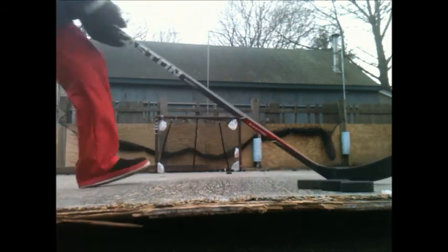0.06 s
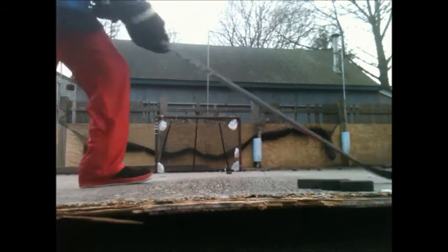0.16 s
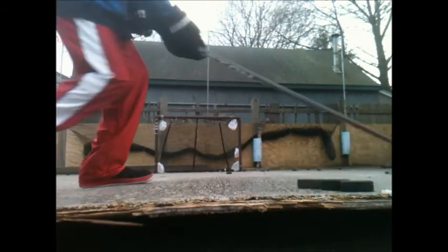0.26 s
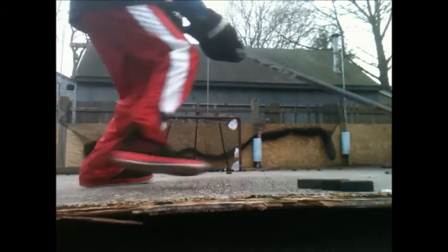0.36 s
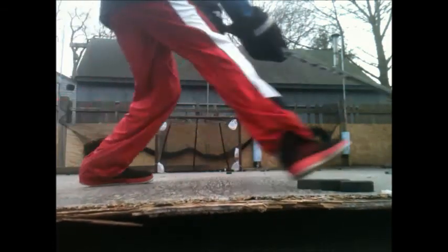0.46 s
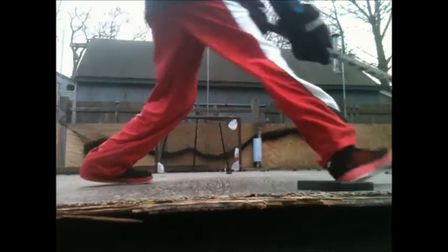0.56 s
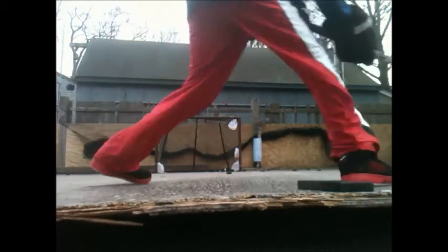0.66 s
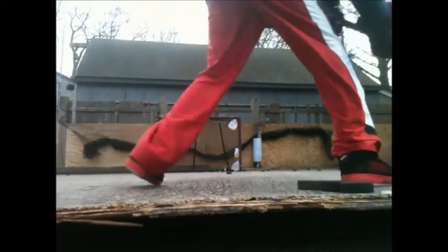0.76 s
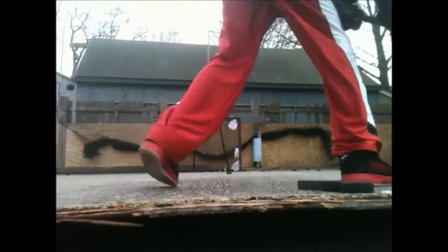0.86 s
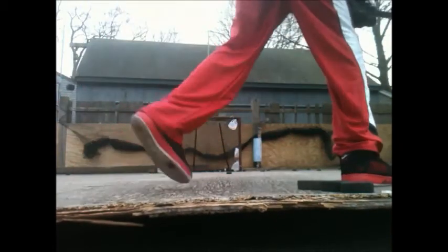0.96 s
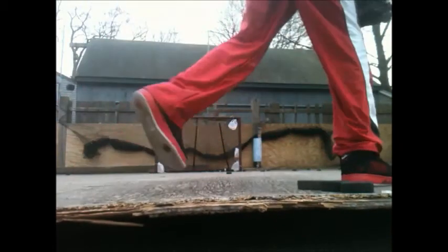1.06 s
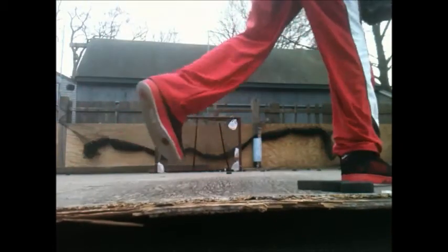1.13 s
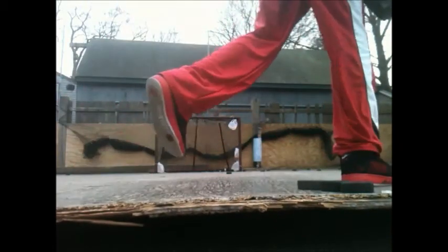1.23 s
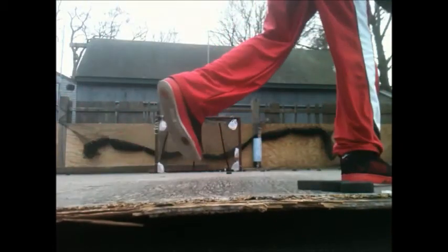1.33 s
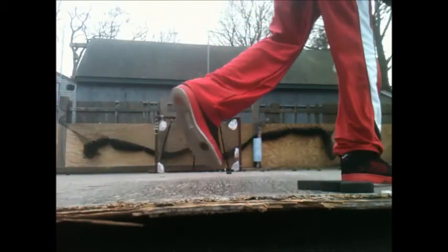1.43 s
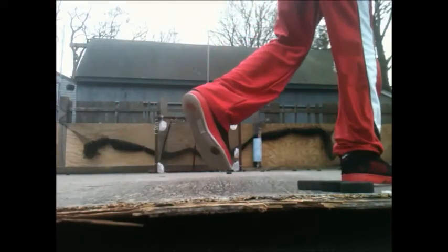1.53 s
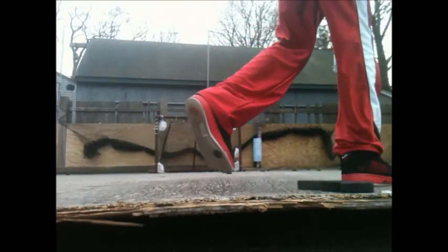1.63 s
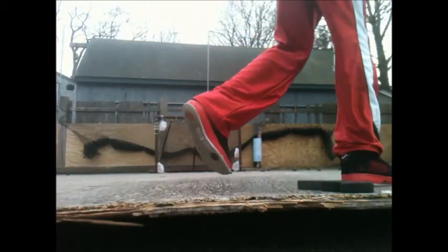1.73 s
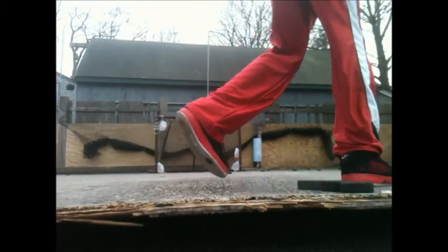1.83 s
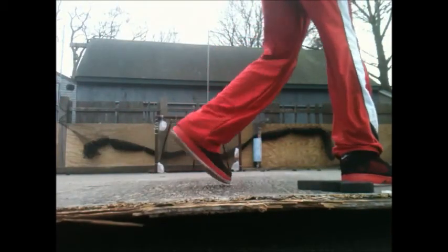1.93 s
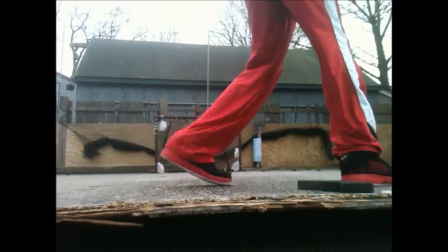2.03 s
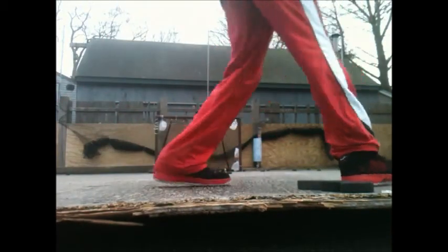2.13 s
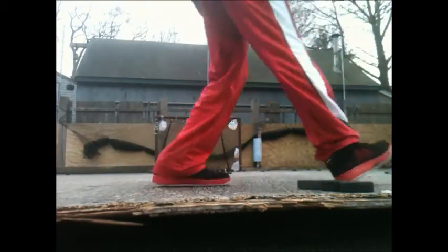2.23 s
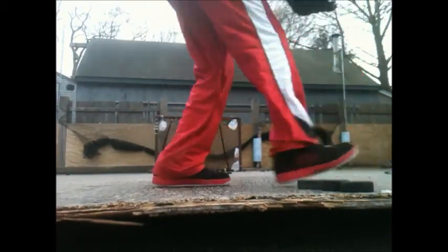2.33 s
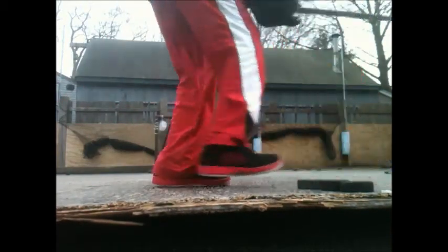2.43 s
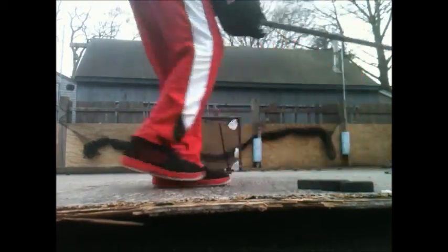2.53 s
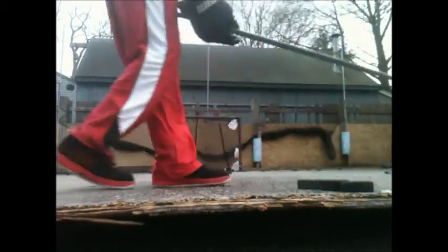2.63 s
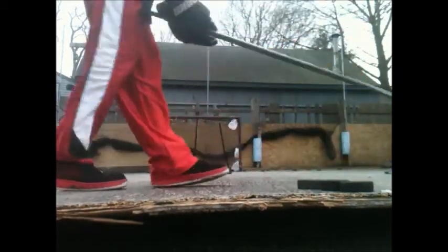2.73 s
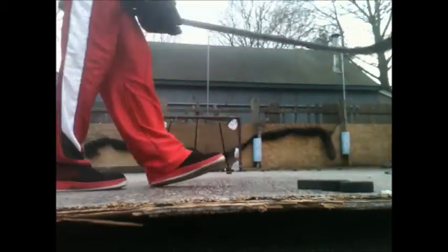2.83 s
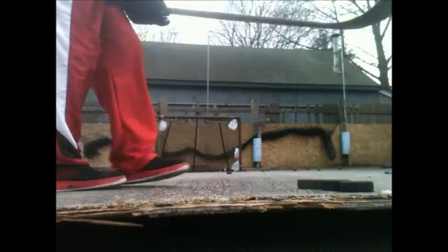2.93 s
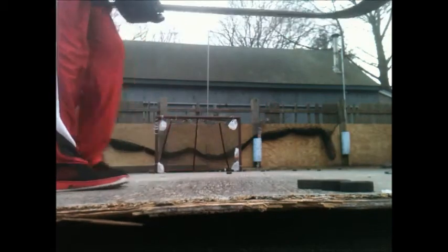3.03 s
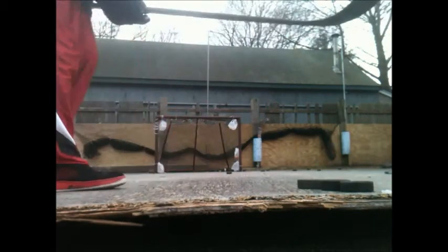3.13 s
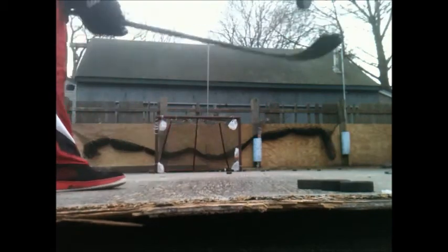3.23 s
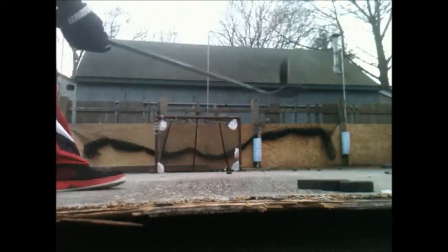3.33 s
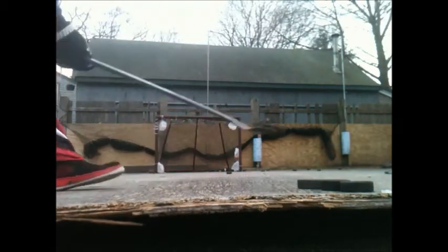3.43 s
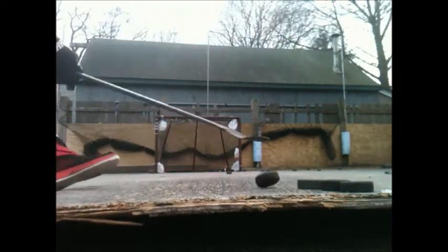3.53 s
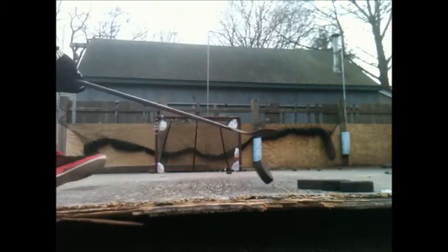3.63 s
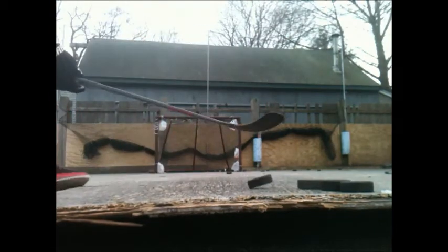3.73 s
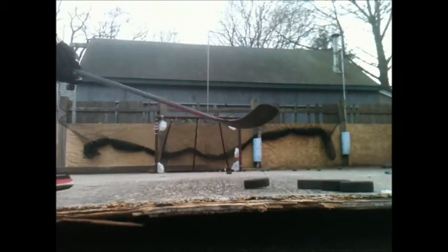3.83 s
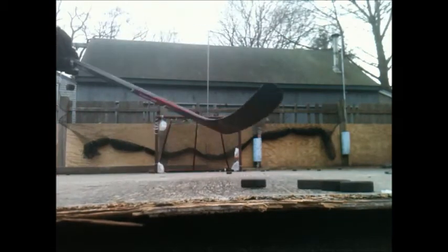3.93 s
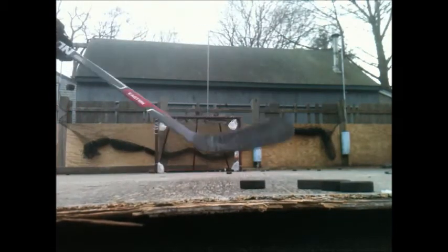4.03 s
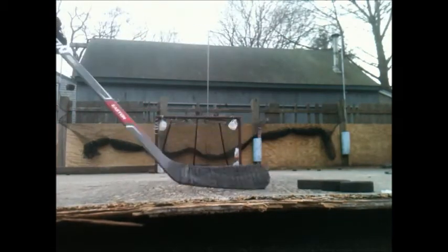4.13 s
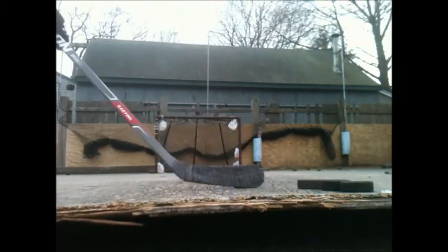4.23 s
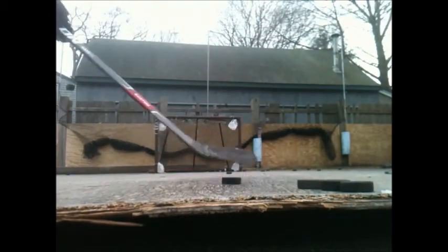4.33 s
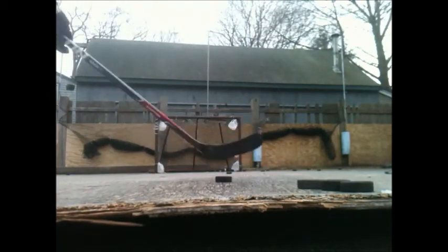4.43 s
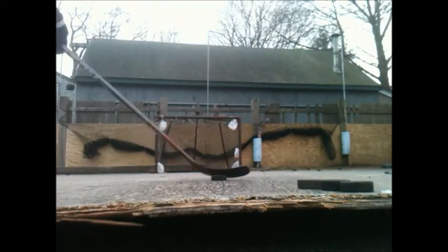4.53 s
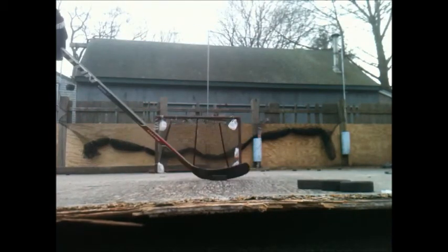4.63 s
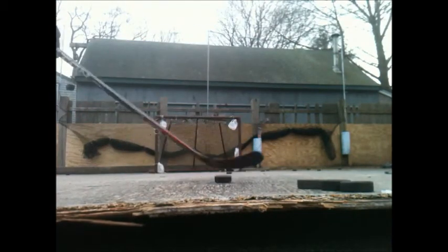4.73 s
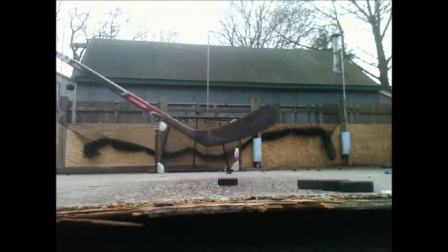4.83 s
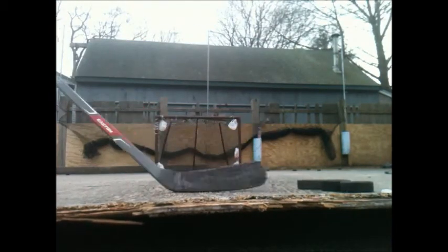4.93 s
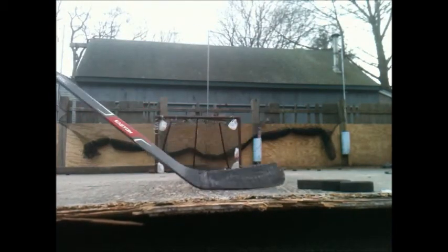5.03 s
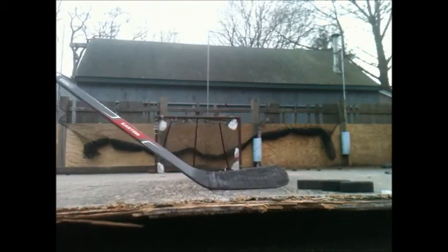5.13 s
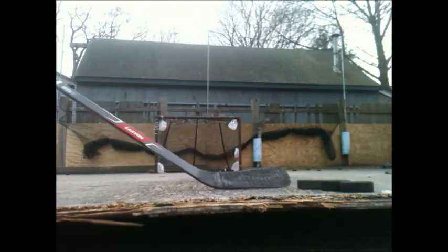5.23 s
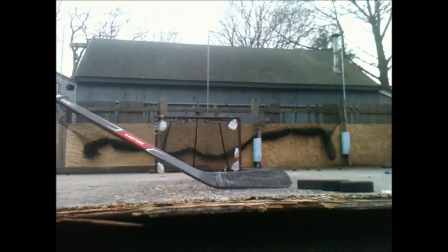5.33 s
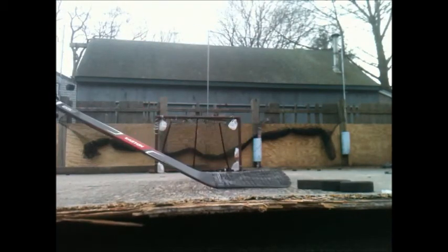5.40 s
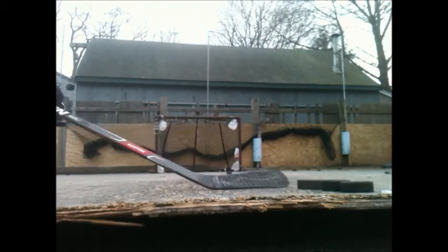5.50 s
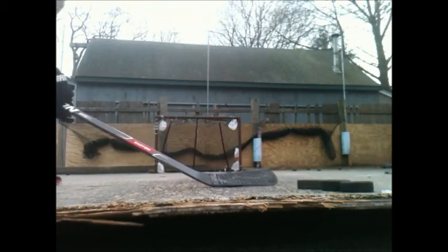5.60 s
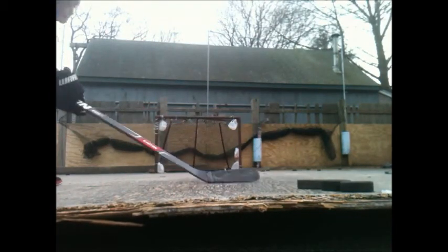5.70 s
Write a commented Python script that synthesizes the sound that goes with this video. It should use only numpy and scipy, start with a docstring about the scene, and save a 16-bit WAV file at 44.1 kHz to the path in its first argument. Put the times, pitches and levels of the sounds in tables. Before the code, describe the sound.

Heard up close in a backyard, a stick and puck clack and scrape on a gritty wooden board. A quick drag and cracking shot come first, followed by a dull, distant boom. After a lull of light shoe scuffs and rustling pants, a loud knock starts a busy run of bounces, taps and slides, peaking in a slap of the blade that overloads the microphone. A faint outdoor hum lies underneath.

```python
"""A hockey stick and puck knock on a wooden shooting board, heard from its edge in a backyard.
The stick drags and shoots a puck with a crack, and the far boards boom. The player steps over, knocks
a new puck off the pile, lets it bounce, taps it into place and slaps the blade down. Blows make the
wood ring, rubs crunch on its grit, and track pants swish over a faint outdoor hum.
The yard adds a thin echo, and the nearest blows overload the microphone."""
import sys
import numpy as np
from scipy import signal
from scipy.fft import rfft, irfft, next_fast_len
from scipy.io import wavfile
from scipy.ndimage import uniform_filter1d, map_coordinates

SR = 44100
rng = np.random.default_rng(int(sys.argv[2]) if len(sys.argv) > 2 else 0)


def dump_mix(stems):
    """Bounce the given channels to the path in sys.argv[1] as a 16-bit WAV at rate SR."""
    frames = np.atleast_2d(stems).T  # one column per channel
    limited = np.clip(frames, -1, 1)  # hard clip at full scale
    pcm = np.round(limited * 32767).astype(np.int16)
    wavfile.write(sys.argv[1], SR, pcm)


N = 254016
T = np.arange(SR // 3) / SR  # seconds within one blow

# The tone colours of the noises. Each row: frequency in Hz, relative level there in dB.
AIR_COLOUR = [(15, -62), (25, -41.5), (48, -23), (70, -11.5), (206, -2.5), (242, -7), (317, -7),
              (394, -13.5), (476, -11), (1190, -13.5), (2220, -31.5), (9570, -27.5), (14800, -34),
              (16000, -41)]  # distant outdoor hum
BOOM_COLOUR = [(50, -22), (110, -4.5), (170, 7), (330, -1.5), (520, 2), (750, -6), (1500, -10),
               (4000, -30.5)]  # the dull far boards
RUMBLE_COLOUR = [(30, -39.5), (100, -9), (180, 0), (300, 0.5), (550, 0), (1000, -6), (1600, -15),
                 (3000, -25.5), (8000, -51)]  # rubbed wood
HISS_COLOUR = [(500, -17), (1500, -4), (3500, -2), (5500, -5), (7500, -7), (10500, -12.5), (12500, -23.5),
               (15500, -16.5)]  # sliding and cloth
GRIT_COLOUR = [(500, -19), (1500, 2), (2500, -2.5), (3400, -1.5), (4400, -7), (5600, -1.5), (7500, -7.5),
               (10500, -15), (15500, -27.5)]  # crunching grit
CLACK_COLOUR = [(200, -16.5), (550, -1.5), (850, 4), (1100, -4), (1350, -2.5), (1800, -17.5), (2600, -24.5),
                (5000, -46), (16000, -70.5)]  # the woody middle of a blow
CRACK_COLOUR = [(500, -16.5), (1500, -4), (2400, -4.5), (3800, 1), (5500, -8.5), (7500, -12.5),
                (10000, -23.5), (15500, -28)]  # the bright top of a blow
# The yard's echo. Each row: frequency in Hz, seconds to fade by 60 dB.
ECHO_TIMES = [(150, 0.5), (500, 0.52), (1500, 0.56), (4000, 0.4), (12000, 0.27)]
# Swings of a leg. Each row: middle in seconds, half length in seconds, level in dB.
LEG_SWINGS = [(0.047, 0.22, -67), (0.622, 0.28, -64), (1.714, 0.12, -71.5), (2.19, 0.2, -67.5),
              (2.794, 0.21, -65.5), (3.436, 0.062, -59.5)]
# Chirps of the taped blade. Each row: middle in seconds, half length in seconds, pitch in Hz, level in dB.
BLADE_SQUEAKS = [(3.936, .035, 3370, -49), (4.539, 0.0079, 3460, -48)]
# Short scuffs of blade and shoes. Each row: start and length in seconds, rumble and crunch in dB.
SHORT_SCUFFS = [(0.035, 0.081, -50, -52), (0.141, 0.032, -34, -47), (0.179, 0.028, -28.5, -40.5),
                (0.588, 0.048, -22.5, -33), (0.649, 0.033, -32.5, -33.5), (2.123, 0.16, -62, -60),
                (2.289, 0.019, -37.5, -44.5), (2.536, 0.086, -45.5, -63), (2.673, 0.06, -42, -44.5),
                (2.907, 0.046, -46.5, -48.5), (3.141, 0.054, -52, -55), (3.34, 0.11, -50, -53),
                (4.247, 0.061, -40, -49), (5.66, 0.054, -31.5, -49.5)]
# Puck or blade pushed across the board. Each row: start and length in seconds, rumble and hiss in dB,
# seconds to reach full pressure.
LONG_GLIDES = [(3.615, 0.24, -46, -54.5, .02), (3.855, 0.14, -31, -43, 0.027),
               (4.19, .13, -37.5, -60, 0.014), (4.357, 0.25, -35, -55, 0.018),
               (4.625, 0.15, -35.5, -57, 0.012), (4.837, 0.37, -33.5, -48, .02),
               (5.005, 0.073, -18.5, -53, 0.016), (5.145, 0.048, -29, -34.5, .012),
               (5.243, 0.21, -50, -63.5, .02), (5.483, 0.31, -26.5, -46.5, 0.16)]
# The resonances of the stick's blade. Each row: pitch in Hz, width in Hz, level in dB.
BLADE_TONES = [(590, 160, 11), (1023, 150, 11), (1290, 250, 6), (1750, 470, 2.5), (2170, 480, -1),
               (2590, 530, -2), (3750, 410, -0.5), (4780, 870, -2), (5660, 1200, -2), (7400, 570, -2.5),
               (10200, 1300, -9.5)]
# Sharp clicks and snaps, alone or as the bright edge of a blow on the board.
# Each row: start in seconds, level in dB, centre in Hz, width as a multiple of the centre.
HARD_CLICKS = [(.1225, -30.5, 3470, 0.91), (0.3453, -41.5, 5430, 1.54), (.404, -45.5, 2515, 0.78),
               (0.593, -21, 4650, 0.94), (0.6481, -19, 1983, 0.81), (.664, -26.5, 4800, 0.56),
               (0.678, -23, 3730, 2.5), (0.7143, -14, 3700, 1.94), (0.7419, -25, 2730, 1.3),
               (0.9013, -38, 2500, .6), (1.011, -41.5, 2080, 0.85), (1.116, -32.5, 1560, 0.91),
               (2.048, -40.5, 3020, 1.14), (2.121, -39, 2780, 1.46), (2.309, -34.5, 4500, 1.6),
               (2.5814, -35, 2900, 2.3), (2.8506, -29, 3570, 1.1), (3.155, -40, 4750, 0.96),
               (3.404, -31, 3462, 3.9), (3.642, -34.5, 3700, 1.37), (4.2985, -38, 3953, 0.59),
               (4.7512, -40, 4694, 1.974), (4.779, -42.5, 4940, 2), (4.844, -33, 1924, 0.96),
               (4.982, -7.5, 1900, 0.38)]
# The tones of the wooden board. Each row: pitch in Hz, level in dB, base seconds to fade by 60 dB.
BOARD_TONES = [(184, -23, 0.22), (231, -27.5, 0.11), (290.2, -5.5, 0.21), (310.7, -8, 0.25),
               (352.5, -4, 0.093), (403, 3, 0.063), (463.4, -1, 0.065), (528.6, 0, 0.089), (570, -7, 0.069),
               (720, -12.5, 0.14), (815, -14.5, 0.1), (1324, -28, 0.088)]
# Stick, puck and feet hitting the board. Each row: start in seconds, thud level in dB, clack and crack
# in dB relative to the thud, favoured pitch in Hz, ring length factor, rebound gap in seconds.
BOARD_BLOWS = [(0.124, -29, -3.5, -6, 350, 1.35, 0), (.187, -25.5, 0, -21.5, 549, 1.13, 0.0015),
               (0.592, -13.5, -3, -22, 354, 0.32, 0.0024), (0.616, -12.5, -10.5, -10, 450, 0.28, 0),
               (0.6479, -18.5, -2.5, -14, 590, 0.42, 0), (2.013, -30, -2.5, -23, 372, 0.92, 0.0067),
               (2.671, -19, -8.5, -22.5, 480, 0.75, 0.0011), (3.405, -29.5, 7.5, -8, 690, 1.35, 0),
               (3.5781, 3, -4.5, -11, 424, .9, .011), (3.7536, -3, -4, -11.5, 451.3, 0.91, .015),
               (3.886, -17.5, -33, -41, 410, 1.4, 0), (3.896, -13, -12, -20.5, 417, 0.64, 0),
               (3.984, -15.5, -16.5, -27, 346.4, 0.33, 0.00011), (4.022, -11, -10, -23, 406.6, 0.76, 0.021),
               (4.168, -2.5, -6.5, -16.5, 388, 0.77, 0.0059), (4.224, -20.5, -3, -20, 351, 0.64, 0.00055),
               (4.257, -23.5, -19, -12.5, 365.5, 1.06, 0), (4.339, -36.5, 4.5, -6.5, 360, 0.58, 0.00038),
               (4.366, -22, 1, -21, 591, 1.3, 0), (4.424, -19.5, -2, -19, 530, 1.35, 0.00085),
               (4.514, -30, -14, -18, 340, 0.75, 0), (4.614, -8, -1, -28.5, 523, 0.62, .013),
               (4.658, -18.5, -7, -30.5, 484, 0.41, 0), (4.816, -17, 1, -23.5, 493, 0.94, 0.0051),
               (4.981, 3, -6, -7.5, 444, 0.75, 0.011), (5.0669, -8, -4.5, -15.5, 399.3, 1.12, 0),
               (5.106, -10.5, -8, -29.5, 303, 0.54, 0), (5.479, -9.5, -7, -29.5, 380, 0.67, 0),
               (5.604, -12, -10, -27, 535, 0.79, 0), (5.611, -11.5, 4, -19.5, 517, 0.61, 0.019)]


def amp(db):
    """Turn decibels into a gain."""
    return 10 ** (np.asarray(db) / 20)


def unit(x):
    """Scale a sound to an average (rms) level of 1."""
    return x / np.sqrt(np.mean(x ** 2) + 1e-20)


def punch(x):
    """Scale a sound so its loudest 4 milliseconds have an average (rms) level of 1."""
    return x / np.sqrt(uniform_filter1d(x ** 2, size=176, mode="constant").max() + 1e-20)


def along(points, hz):
    """Read between the rows of a frequency table, on a log scale."""
    freqs, values = np.transpose(points)
    return np.interp(np.log(hz + 1), np.log(freqs + 1), values)


def wobble(rate, size=N):
    """A smooth random curve through `rate` points a second."""
    points = rng.standard_normal(int(size * rate / SR) + 4)
    return map_coordinates(points, [np.arange(size) * rate / SR])


def filtered(x, response):
    """Give each frequency of a sound the gain response(hz)."""
    size = next_fast_len(len(x) + 8192)
    return irfft(rfft(x, size) * response(np.fft.rfftfreq(size, 1 / SR)), size)[:len(x)]


def bass_cut(hz, corner_hz):
    """A filter curve that weakens everything below the corner."""
    return 1j * hz / (corner_hz + 1j * hz)


def resonance(f, hz, width):
    """The filter curve of something that rings at hz."""
    return 1j * f * width / (hz * hz - f * f + 1j * f * width)


def noise(colour, size=N):
    """Steady noise with the given tone colour."""
    return unit(filtered(rng.standard_normal(size), lambda hz: amp(along(colour, hz))))


def fade(seconds):
    """A level that falls by 60 dB in the given time."""
    return amp(-60 * T / max(seconds, 1e-4))


def swell(middle, half_length):
    """A level that rises and falls in a bell shape."""
    return np.exp(-((np.arange(N) / SR - middle) / half_length) ** 2)


def stroke(start, length, attack, release, sag_db_per_s=0):
    """The level of one rub: it rises, holds or sags, then dies away."""
    t = np.maximum(np.arange(N) / SR - start, 0)
    return np.minimum(t / attack, 1) * amp(-sag_db_per_s * t) * np.exp(-np.maximum(t - length, 0) / release)


def add(track, start, sound):
    """Mix a sound into the track at `start` seconds."""
    part = track[max(round(start * SR), 0):][:len(sound)]
    part += sound[:len(part)]


def friction(colour, rough_db, grain_share, grains_per_s=420):
    """Rubbing is an uneven drag plus single grains that catch, coloured by the surface."""
    drag = unit(rng.standard_normal(N) * amp(rough_db * wobble(450) + 2.6 * wobble(60)))
    strength = amp(4 * np.minimum(rng.exponential(size=N), 3)) * rng.choice([-1, 1], N)
    grains = unit((rng.random(N) < grains_per_s / SR) * strength)
    rub = np.sqrt(1 - grain_share) * drag + np.sqrt(grain_share) * grains
    return unit(filtered(rub, lambda hz: amp(along(colour, hz))))


def patchy(x, depth_db):
    """The colour of a rub shifts as the contact moves over the surface."""
    spectrum = signal.stft(x, nperseg=256)[2]
    patches = uniform_filter1d(rng.standard_normal(spectrum.shape), size=5, axis=0)
    patches = unit(uniform_filter1d(patches, size=10, axis=1))
    return unit(signal.istft(spectrum * amp(depth_db * patches), nperseg=256)[1][:N])


def background(air_db=-62, whine_db=-73):
    """A distant outdoor hum and a thin, high electronic whine."""
    whine = filtered(rng.standard_normal(N), lambda hz: np.exp(-((hz - 15000) / 200) ** 2))
    hum = amp(air_db + 0.98 * wobble(8.7)) * noise(AIR_COLOUR)
    return hum + amp(whine_db) * unit(whine)


def yard_echo(x, build_up_s=0.025):
    """Fence, shed and house return a thin echo, a little different every quarter second."""
    out, step = np.zeros(N), SR // 4
    for first in range(0, N, step):
        hz, t, spectrum = signal.stft(rng.standard_normal(SR), SR, nperseg=256)
        decay = amp(-60 * t / along(ECHO_TIMES, hz)[:, None])
        tail = signal.istft(spectrum * decay, SR, nperseg=256)[1]
        tail *= 1 - np.exp(-np.arange(len(tail)) / SR / build_up_s)
        add(out, first / SR, signal.fftconvolve(x[first:first + step], tail / np.linalg.norm(tail)))
    return out


def clothes(still_db=-77):
    """Track pants swish with each swing of a leg and rustle faintly in between."""
    motion = amp(still_db) + sum(amp(db) * swell(middle, half) for middle, half, db in LEG_SWINGS)
    return motion * friction(HISS_COLOUR, rough_db=2.0, grain_share=.2)


def far_boom(start=.79, boom_db=-39, rise_s=.06, fade_s=.5):
    """The shot puck reaches the far boards, which answer with a soft boom."""
    t = np.arange(SR) / SR
    level = (1 - np.exp(-t / rise_s)) * amp(-60 * t / fade_s)
    out = np.zeros(N)
    add(out, start, amp(boom_db) * punch(noise(BOOM_COLOUR, size=SR) * level))
    return out


def squeaks(width_hz=450):
    """The taped blade sticks and slips unevenly, which rings one narrow resonance."""
    out = np.zeros(N)
    for middle, half, hz, db in BLADE_SQUEAKS:
        chirp = filtered(rng.standard_normal(N), lambda f: resonance(f, hz, width_hz) ** 2)
        out += amp(db) * swell(middle, half) * unit(chirp)
    return out


def scrapes(trim_db=-1):
    """Glides and scuffs rumble in the board, and hiss and crunch on its gritty face."""
    rumble_level, hiss_level, crunch_level = np.zeros((3, N))
    for start, length, rumble_db, hiss_db, attack in LONG_GLIDES:
        # A glide gets quieter as it slows, the rumble sooner than the hiss.
        timing = start, length, attack
        rumble_level += amp(rumble_db + trim_db) * stroke(*timing, release=0.036, sag_db_per_s=44)
        hiss_level += amp(hiss_db + trim_db) * stroke(*timing, release=0.036, sag_db_per_s=9.5)
    for start, length, rumble_db, crunch_db in SHORT_SCUFFS:
        scuff = stroke(start, length, attack=0.0099, release=0.013)
        rumble_level += amp(rumble_db) * scuff
        crunch_level += amp(crunch_db + trim_db) * scuff
    crunch = patchy(friction(GRIT_COLOUR, rough_db=3.5, grain_share=.55), depth_db=4)
    hiss = patchy(friction(HISS_COLOUR, rough_db=1.5, grain_share=.1), depth_db=2.2)
    rumble = friction(RUMBLE_COLOUR, rough_db=5.5, grain_share=0.26)
    return rumble_level * rumble + hiss_level * hiss + crunch_level * crunch


def stones(per_second=55, most_per_rub=24, scatter_db=2.5, centre_hz=3300, width=1.3):
    """List the clicks of small stones under each rub; a light glide presses less than a scuff."""
    for rubs, pressure_db in ((SHORT_SCUFFS, 0), (LONG_GLIDES, -3)):
        for start, length, _, rub_db, *_ in rubs:
            for k, (jitter, loudness, tone) in enumerate(rng.standard_normal((most_per_rub, 3))):
                delay = (k + .5 + .25 * jitter) / per_second
                if 0 < delay < length:
                    db = rub_db + pressure_db + scatter_db * loudness
                    yield start + delay, db, centre_hz * np.exp(0.36 * tone), width


def blade(f):
    """The filter curve of the stick's blade: its resonances added with alternating signs."""
    return sum((-1) ** k * amp(db) * resonance(f, hz, width)
               for k, (hz, width, db) in enumerate(BLADE_TONES))


def clicks(boost_db=1):
    """A sharp snap and a short rattle ring the blade; each click has its own pitch and width."""
    out = np.zeros(N)
    for start, db, centre_hz, width in [*HARD_CLICKS, *stones()]:
        force = rng.standard_normal(len(T)) * (fade(.005) + amp(-12) * fade(.034))
        snap = filtered(force, lambda f: blade(f) * resonance(f, centre_hz, width * centre_hz) ** 2)
        add(out, start, amp(db + boost_db) * punch(snap))
    return out


def contacts(gap_growth=1.5, loss_db=7, dulling_db=5.5):
    """List the blows. A flat one (gap over 4 ms) rebounds twice, each time later, weaker and duller."""
    for start, db, clack_db, crack_db, pitch_hz, length, gap in BOARD_BLOWS:
        for k in range(3 if gap > .004 else 1):
            yield start, db - k * loss_db, clack_db, crack_db - k * dulling_db, pitch_hz, length
            start += gap * gap_growth ** k


def board_ring(pitch_hz, length, rise_s, focus_db=8.5, scatter_db=1.65):
    """The board rings with many tones; the spot that is struck favours those near one pitch."""
    hz, db, fade_s = np.transpose(BOARD_TONES)
    favour_db = focus_db * np.exp(-(np.log2(hz / pitch_hz) * 3) ** 2)
    gains = amp(db + favour_db + scatter_db * rng.standard_normal(len(hz)))
    hz = hz * (1 + .01 * rng.standard_normal(len(hz)))  # the player's weight shifts the tones
    phases = .35 * rng.standard_normal(len(hz))
    ring = sum(gain * np.sin(2 * np.pi * f * T + phase) * fade(seconds * length)
               for gain, f, phase, seconds in zip(gains, hz, phases, fade_s))
    return punch(ring * (1 - np.exp(-T / rise_s)))


def blows(clack_trim_db=-1, push_hz=900):
    """Each hit on the board gives a low thud, a woody clack and a bright crack with a dry rattle."""
    out = np.zeros(N)
    first_push = 0.45 * punch(np.sin(2 * np.pi * push_hz * T) * fade(0.0076) * (1 - np.exp(-T / 0.0011)))
    for start, db, clack_db, crack_db, pitch_hz, length in contacts():
        length = np.clip(length, .4, 1.5)
        rise_s = np.interp(clack_db, [-20, -5], [.004, .0012])  # soft contacts load the board slowly
        wood = noise(CLACK_COLOUR, size=len(T)) * fade(0.049 * length) * (1 - np.exp(-T / 0.00063))
        clack = punch(first_push + punch(wood))
        rattle = amp(-17.5 + 3.2 * wobble(170, size=len(T))) * fade(.07)
        crack = punch(noise(CRACK_COLOUR, size=len(T)) * (fade(0.005) + rattle))
        thud = board_ring(pitch_hz, length, rise_s)
        hit = thud + amp(clack_db + clack_trim_db) * clack + amp(crack_db) * crack
        add(out, start, amp(db) * hit)
    # Cut the low thump so each blow sounds like a dry wooden knock.
    return filtered(out, lambda hz: bass_cut(hz, corner_hz=110))


def scene():
    """Mix it all: sounds on the board have little echo, while sharp clicks carry round the yard."""
    near = blows() + scrapes() + squeaks()
    around = far_boom() + clothes() + background()
    sharp = clicks()
    echo = yard_echo(amp(-25.0) * near + amp(-20.5) * sharp)
    return (near + sharp + echo + around)[None]


def record(dry, bass_hz=130, bottom_hz=25, top_hz=16000):
    """The small microphone thins the bass, overloads on loud blows and loses the extreme lows and highs."""
    thin = filtered(dry[0], lambda hz: bass_cut(hz, bass_hz))
    clipped = thin / (1 + np.abs(thin) ** 8) ** (1 / 8)
    return filtered(clipped, lambda hz: bass_cut(hz, bottom_hz) / (1 + (hz / top_hz) ** 120))[None]


dry = scene()
out = record(dry)
dump_mix(out)
```